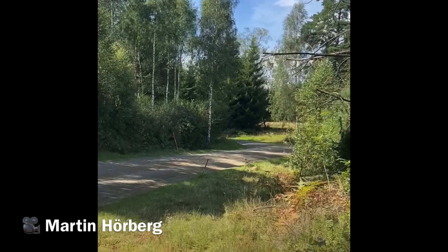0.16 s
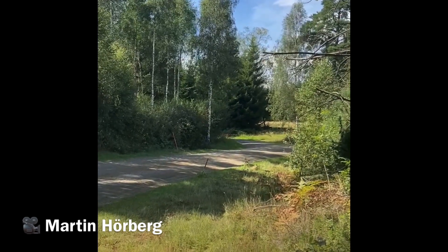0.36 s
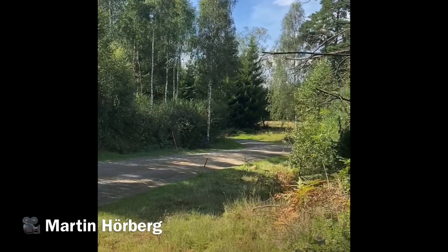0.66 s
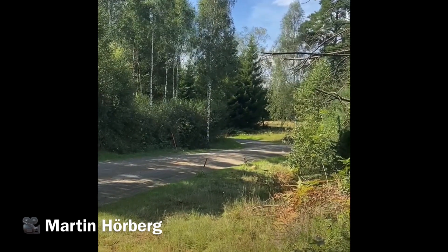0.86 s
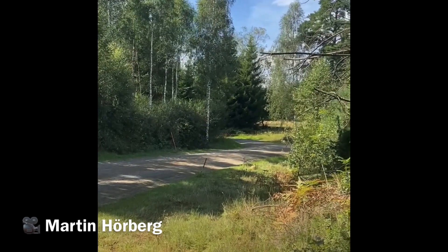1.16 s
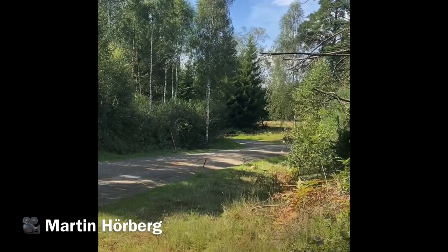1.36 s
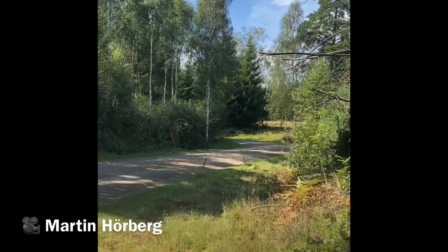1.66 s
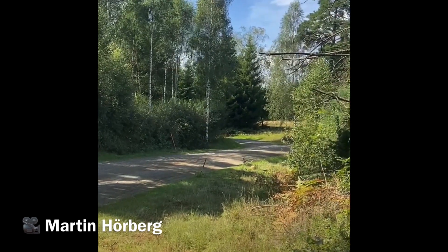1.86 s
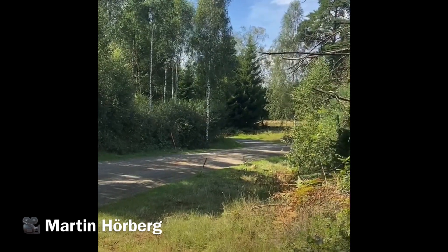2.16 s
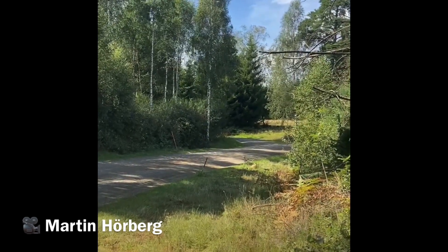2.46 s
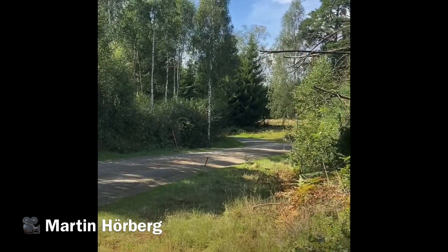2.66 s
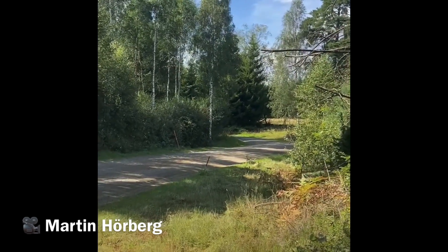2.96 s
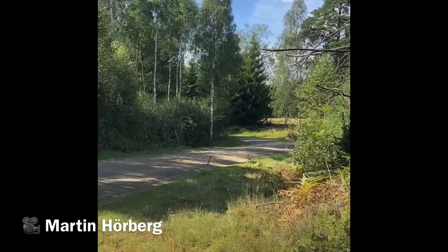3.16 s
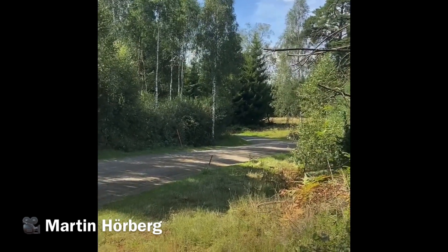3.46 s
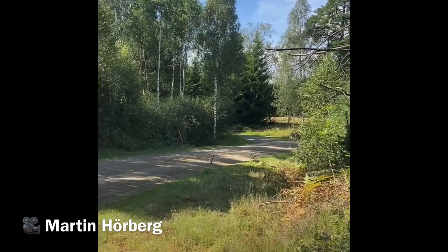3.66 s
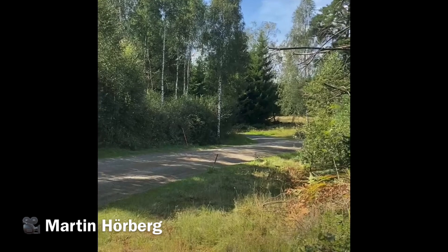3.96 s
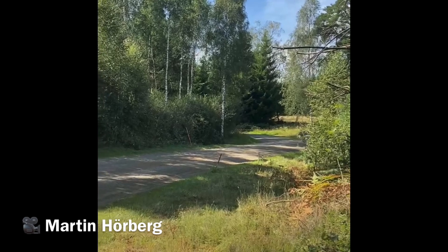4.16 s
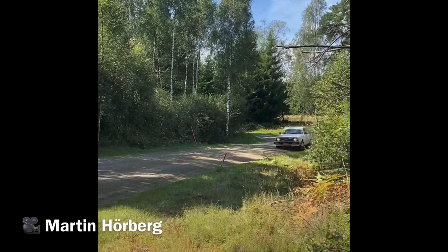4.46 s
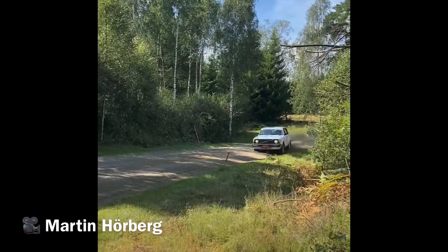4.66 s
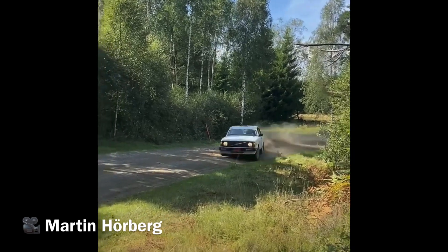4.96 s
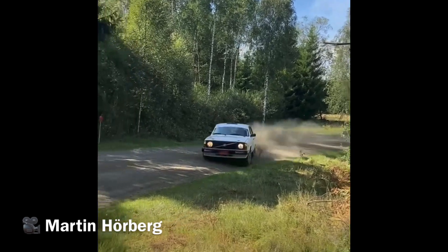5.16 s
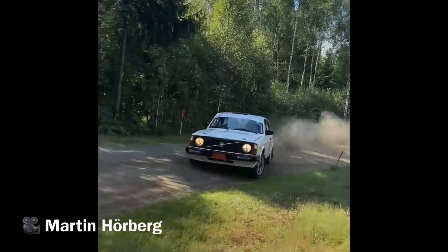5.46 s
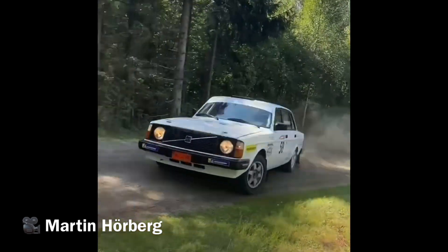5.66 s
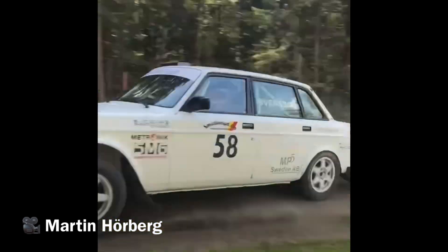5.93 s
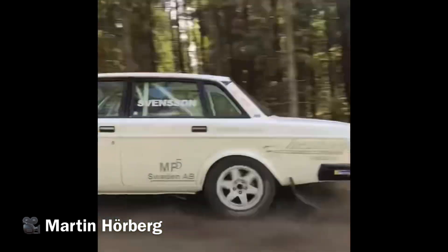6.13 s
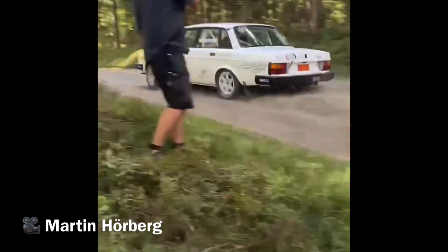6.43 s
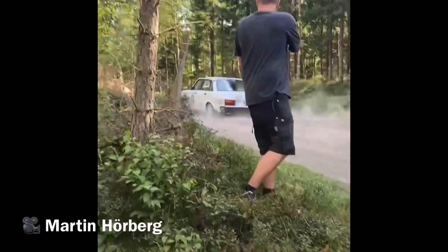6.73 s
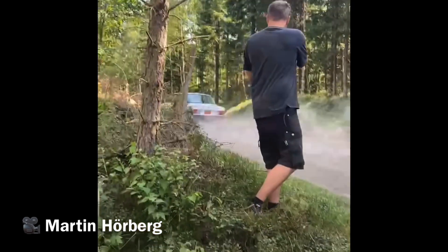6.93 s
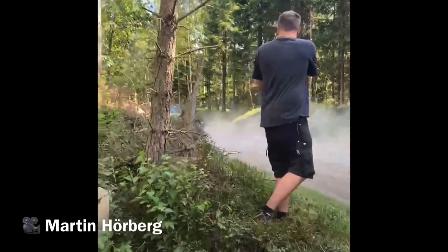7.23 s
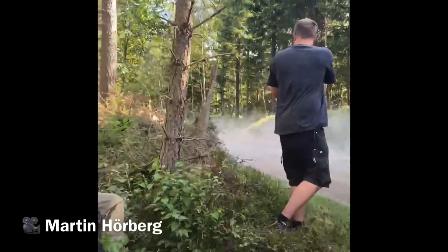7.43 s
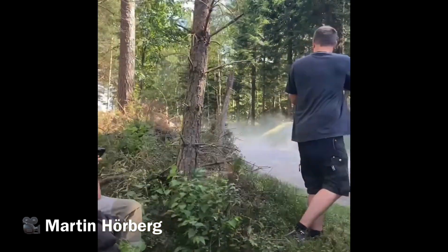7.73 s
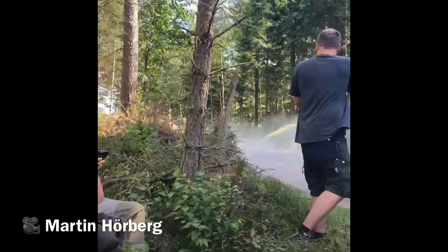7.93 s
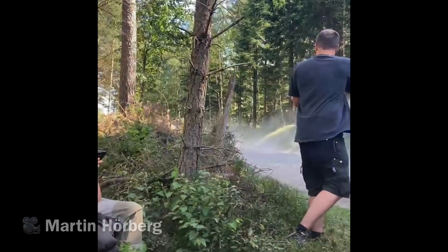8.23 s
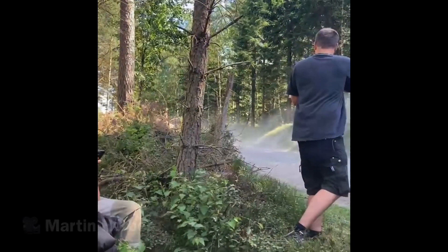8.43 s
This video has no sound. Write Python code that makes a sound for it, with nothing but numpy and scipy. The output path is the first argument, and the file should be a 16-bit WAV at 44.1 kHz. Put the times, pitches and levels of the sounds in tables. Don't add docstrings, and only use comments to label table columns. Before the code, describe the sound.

Distant engine revving swells through gusty wind into a loud close pass, crackling exhaust and hissing gravel, then recedes with a late gear change.

```python
import sys
import numpy as np
from scipy import signal
from scipy.fft import rfft, irfft, next_fast_len
from scipy.io import wavfile
from scipy.ndimage import uniform_filter1d, map_coordinates

SR = 44100
rng = np.random.default_rng(int(sys.argv[2]) if len(sys.argv) > 2 else 0)


def ratio_of_db(decibels):
    return 10 ** (np.asarray(decibels, float) / 20)


def to_wav(sig):
    pcm = np.clip(np.atleast_2d(sig), -1, 1) * 32767
    pcm = np.round(pcm).astype(np.int16)
    wavfile.write(sys.argv[1], SR, pcm.T)


N = 378814
MS = np.arange(0, N / SR + .002, .001)

# [time_s, firing_hz]
SPEED = [(0.0, 179.1), (0.5, 186.6), (1.48, 160.1), (1.58, 165.7), (1.86, 146), (2.52, 168.6),
         (3.68, 162.6), (3.99, 83.8), (4.25, 159.1), (4.6, 164.2), (5.05, 202.1), (5.26, 197.2),
         (5.61, 216.8), (5.92, 205.5), (6.8, 202.3), (7.09, 213.1), (7.51, 192.1), (8.59, 226.7)]
# [start_s, end_s, change_hz, lag_s]
SURGES = [
    (0.557, 0.86, -33, 0.039),
    (1.876, 2.067, 24, 0.073),
    (2.53, 2.964, 69, 0.14),
    (4.237, 4.435, 21, 0.068),
    (8.146, 8.993, -62.5, 0.081),
    (4.645, 4.757, 6.5, 0.029),
    (4.855, 5.055, -2, 0.046),
    (5.305, 5.444, 4, 0.068),
    (5.678, 5.803, 2.5, 0.033),
]


def engine_speed():
    pushes = sum(change * lagged(start, end, lag, lag) for start, end, change, lag in SURGES)
    return curves(SPEED)[0] + smooth(pushes)


# [start_s, end_s, extra_roar_db]
THROTTLE = [(0.484, 0.835, 8), (0.718, 0.857, 3), (0.887, 1.055, 5), (1.855, 2.036, 3), (2.523, 2.95, 10.5),
            (2.803, 2.974, -1.5), (3.59, 3.911, 5), (3.966, 4.028, 11.5), (4.125, 4.426, 9.5),
            (4.636, 4.896, 5), (4.7, 4.78, 2), (4.939, 5.251, 2), (5.276, 5.68, 0.5), (5.704, 5.861, 4)]


def throttle():
    open_lag_s, close_lag_s = 0.033, 0.036
    return smooth(sum(db * lagged(start, end, open_lag_s, close_lag_s) for start, end, db in THROTTLE))


# [multiple_of_cycle_rate, level_db]
INTAKE_ORDERS = [(6, -28), (7, -20), (9, -23), (10, -27), (11, -19), (12, -17), (13, -17), (14, -19),
                 (15, -27), (16, -25), (17, -19), (18, -27),
                 (19, -20)] + [(k, -24 + 4 * (k % 4 == 0) - .45 * (k - 20)) for k in range(20, 56)]
# [time_s, low_hz, middle_hz, high_hz, tilt_db_per_octave]
AIRBOX = [(0.67, 707, 857, 1000, -1.5), (1.93, 777, 994, 1200, -3.5), (2.62, 816, 920, 1400, -1),
          (2.78, 832, 926, 1350, -3.5), (2.92, 843, 965, 1300, -2), (3.75, 833, 990, 1300, 1.5),
          (4.2, 690, 970, 1200, 12), (4.36, 690, 900, 1330, 3.5), (4.68, 702, 970, 1450, 3.5),
          (4.78, 695, 934, 1520, 5), (4.9, 663, 1130, 1800, 4), (5.05, 637, 980, 1400, 0),
          (5.25, 677, 896, 1450, 2), (5.45, 642, 900, 1150, -2), (5.62, 663, 726, 910, 1),
          (5.75, 630, 820, 1250, -2), (5.87, 834, 1037, 1260, 2)]
# [freq_hz, level_db]
HISS = [(260, -48), (450, -32.5), (673, -6.5), (778, -7.5), (941, -2.5), (1470, -12), (3360, -36),
        (5500, -36), (6500, -49), (8450, -57.5), (14300, -120)]
# [time_s, level_db]
SHADE = [(6.1, -1.5), (7.0, -19.5), (8.3, -37.5)]


def intake(firing_hz, firings, near_db, open_db):
    coast_db, lines_db, air_db = -5, 3.5, -17
    roar_db = coast_db + LOW_SHARE * near_db + open_db + curves(SHADE)[0]
    *box_hz, tilt_db = curves(AIRBOX)
    start = rng.uniform(0, 2 * np.pi, len(INTAKE_ORDERS))
    lines = shapes(INTAKE_ORDERS, firing_hz / 4, start, box_hz, tilt_db,
                   peak_db=6, scatter_db=1.5, drift=.1, rate=8)
    past = np.clip((np.arange(N) / SR - 5.55) / 0.047, 0, 1)
    five_db = curves(EXHAUST)[0] - 7 - 8 * past
    beat_db = five_db + 1 + np.clip(1.5 * (roar_db + 23), -20, 0)
    beat = ratio_of_db(beat_db) * (np.cos(2.5 * np.pi * firings) + ratio_of_db(-8) * np.cos(1.5 * np.pi * firings + 2))
    veil_db = np.clip(roar_db + 24.5, -9, 0)
    valves = ratio_of_db(1.2 * np.cos(2 * np.pi * firings) + 1.5 * np.cos(np.pi / 2 * firings))
    air = coloured(valves * rng.standard_normal(N), HISS)
    return beat + ratio_of_db(roar_db + lines_db + veil_db) * lines + ratio_of_db(roar_db + air_db - veil_db) * air


SKEW = -.9
# [time_s, tone_db, octave_over_tone_db]
EXHAUST = [(0.0, -54, -2.5), (0.5, -44.5, -2), (1.3, -48.5, -4.5), (2.05, -38, -9.5), (2.52, -38.5, -6),
           (2.85, -23.5, -13.5), (3.2, -27, -22.5), (3.7, -25, -13.5), (3.92, -19, -62.5), (4.2, -16, -26),
           (4.65, -20.5, -26.5), (5.0, -10.5, -23), (5.7, -9.5, -21), (5.95, -9.5, -11.5),
           (6.8, -21, -11.5), (7.15, -28, -14.5), (8.08, -33, -27.5), (8.59, -38.5, -19.5)]
# [time_s, depth_db, half_length_s]
FADES = [(0.685, -9, 0.064), (1.412, -4, 0.078), (2.56, -6.5, 0.059), (2.965, -18, 0.017),
         (3.145, -7.5, 0.09), (4.06, -6, 0.061), (4.335, -5, 0.064), (4.449, -21, 0.018),
         (4.554, -4.5, 0.061), (4.667, -9, 0.011), (5.965, -15.5, 0.013), (6.091, -11.5, 0.018),
         (5.25, -1, 0.067), (5.798, -6.5, 0.035), (6.036, -2.5, 0.015), (6.168, 1, 0.034),
         (6.401, -0.5, 0.1), (8.197, -12, 0.073)]
# [time_s, octave_db, half_length_s]
STEEPER = [
    (3.07, 11.5, 0.11),
    (4.6, 13, 0.025),
    (4.765, 13.5, 0.069),
    (6.12, 4, 0.065),
    (6.403, -4.5, 0.28),
]
# [time_s, db_under_tone]
LUMP = [(5.9, -29), (6.15, -28), (7.2, -23.5), (7.6, -34.5), (8.59, -23)]
# [time_s, level_db]
SHIFT = [
    (8.09, 3),
    (8.15, 1),
    (8.26, -6.5),
    (8.3, 10),
]


def firing_tone(firings, near_db, behind):
    tone_db, steep_db = curves(EXHAUST)
    faded_db = tone_db + bumps(FADES)
    far = np.clip((-45 - near_db) / 10, 0, 1) * (1 - behind)
    flutter_db = -3.5 * far * wobble(26.28)
    octave_db = tone_db + steep_db + bumps(STEEPER) + curves(SHIFT)[0] + flutter_db
    main = ratio_of_db(faded_db + np.tanh(wobble(24))) * np.cos(2 * np.pi * firings)
    octave = ratio_of_db(octave_db + 1.2 * wobble(30)) * np.cos(4 * np.pi * firings + SKEW)
    shaft = wobble(25) * np.cos(np.pi * firings) + 1.1 * wobble(25) * np.cos(1.5 * np.pi * firings)
    lump = wobble(30) * np.cos(3 * np.pi * firings) + 0.27 * wobble(30) * np.cos(1.5 * np.pi * firings)
    rough = ratio_of_db(faded_db - 24.0) * shaft + ratio_of_db(faded_db + curves(LUMP)[0]) * lump
    return np.sqrt(2) * (main + octave + rough)


# [time_s, bark_db, crack_db]
TAILPIPE = [(5.3, -88.5, -54.5), (5.6, -38.5, -42), (5.82, -24.5, -36), (5.95, -24.5, -34.5),
            (6.1, -20, -25), (6.18, -18.5, -23.5), (6.25, -24, -22), (6.33, -25, -24), (6.42, -23, -23),
            (6.5, -24, -34), (6.57, -27, -44), (6.72, -29.5, -44.5), (6.9, -46.5, -48), (7.05, -41.5, -55),
            (7.2, -46, -58), (7.4, -43, -58), (7.7, -55.5, -63.5), (8.59, -74, -73)]
# [multiple_of_firing_rate, level_db]
BARK = [(k, -13 - 6 * np.log2(k / 3) - 2 * max(k - 13, 0)) for k in range(1, 25)]
# [time_s, peak_hz]
PULSE_PEAK = [(5.8, 1310), (5.95, 2050), (6.05, 1870), (6.13, 1850), (6.19, 1670), (6.38, 1630), (6.45, 1100),
              (6.52, 1625), (6.62, 1460), (6.75, 1590), (6.9, 1790), (7.1, 1270), (7.3, 1740), (7.5, 1250)]
# [freq_hz, level_db]
CRACK = [(710, -51.5), (1200, -6.5), (1700, -3), (2530, -7), (3600, -9.5), (5650, -11.5), (6610, -25),
         (11300, -24.5), (12500, -50.5), (16200, -81.5), (22000, -120)]
# [time_s, level_db]
THIRD = [(5.6, -85), (5.75, -45), (5.95, -37), (6.1, -28), (6.3, -31), (6.5, -41.5), (6.75, -41),
         (6.95, -43), (7.12, -57), (7.25, -45), (7.45, -47.5), (7.7, -56.5), (8.1, -64), (8.59, -78)]
# [time_s, delay_ms, share]
ROAD = [(5.8, .3, 0.33), (5.98, 0.33, 0.5), (6.08, 0.4, 0.53), (6.14, 0.35, 0.96), (6.2, 0.39, 0.79),
        (6.32, .35, .85), (6.4, 0.23, 0.18), (6.5, .33, 0.38), (6.6, 0.14, 0.5), (6.8, 0.43, 0.27)]
# [time_s, delay_ms, share]
GROUND = [(5.8, 1.1, .2), (6.2, 0.74, 0.11), (6.4, 1.4, .3), (6.52, 2.45, 0.34), (6.7, 2.45, 0.34),
          (6.9, 1.5, .5), (7.1, 1.55, 0.88), (7.6, 1.56, .6)]


def tailpipe(firing_hz, firings):
    bark_db, crack_db = curves(TAILPIPE)
    dull_db = -3 + 0.14 * bark_db
    upper = BARK[3:]
    notch = np.maximum(SKEW * (np.arange(len(upper)) + 3), -np.pi)
    pulse = shapes(upper, firing_hz, notch, curves(PULSE_PEAK), dull_db,
                   peak_db=10, scatter_db=2, drift=.3, rate=14)
    crest = np.cos(2 * np.pi * firings) - 1
    burst = (.2 + np.exp(3 * crest)) * ratio_of_db(1.5 * wobble(150))
    edge = np.exp(150 * crest) * ratio_of_db(2 * wobble(60))
    front = ratio_of_db(1) * unit(edge) / np.sqrt(5)
    crack = ratio_of_db(crack_db - 9.5) * coloured(unit(burst * rng.standard_normal(N)) - front, CRACK)
    shot = ratio_of_db(bark_db - 1.5) * pulse + crack
    high = filtered(shot, lambda hz: hz ** 4 / (hz ** 4 + 800 ** 4))
    third_db = curves(THIRD)[0] + wobble(20)
    third = np.sqrt(2) * ratio_of_db(third_db) * np.cos(6 * np.pi * firings + 2 * SKEW)
    return ratio_of_db(curves(SHIFT)[0]) * (shot + third + echo(high, ROAD) + echo(high, GROUND))


def echo(x, rows):
    late_ms, share = curves(rows)
    late = map_coordinates(x, [np.arange(N) - late_ms * SR / 1000], order=1)
    return np.clip(share, 0, 1) * late


LOW_SHARE = 0.66
# [freq_hz, level_db]
ROAR = [(59, -46), (100, -5), (167, 3), (242, -3), (326, 1), (560, -2.5), (1210, -5.5), (2460, -14),
        (3000, -23), (3900, -82.5), (6600, -120)]
# [freq_hz, level_db]
SPRAY = [(880, -12.5), (1500, -5), (5530, -16.5), (6430, -24), (6780, -41), (6960, -90), (7740, -53.5),
         (8240, -17), (9410, -21), (11500, -26.5), (12500, -73.5), (16200, -105), (22000, -120)]
# [time_s, spray_db, extra_top_db, half_length_s]
SHOWERS = [(0.75, -3, 5, .12), (1.9, 7.5, -3, 0.045), (2.62, -4.5, -6, .08), (2.85, 4.5, -5.5, 0.14),
           (3.3, -3.5, -1, 0.49), (4.4, 2.9, 0.5, 0.17), (4.6, -1.2, 3, 0.064), (5.05, -1.5, 1, 0.31),
           (5.7, 0.2, 1, 0.078), (6.2, 1.5, -0.5, 0.086), (6.5, 3, -1.5, 0.056), (6.59, -3, 0, 0.023),
           (6.66, 2, -1, 0.024), (6.78, 0, 4, 0.024), (6.87, 5, 2, 0.043), (7.9, 3.2, 7, 0.55)]


def gravel(near_db, open_db, behind):
    spin_db = 0.61 * open_db
    spray_db = near_db + spin_db
    roar_db = -9 + LOW_SHARE * spray_db - 9 * behind
    shower_db = spray_db + bumps(SHOWERS)
    roar = coloured(ratio_of_db(1.8 * wobble(12)) * rng.standard_normal(N), ROAR)
    grains = coloured(rng.standard_normal(N) * ratio_of_db(1.5 * wobble(600) + 1.3 * wobble(9)), SPRAY)
    fizz = filtered(grains, lambda hz: hz > 7400)
    fizz_db = 0.32 * (shower_db + 14.5) - 0.46 * spin_db + bumps(SHOWERS, column=2)
    return ratio_of_db(roar_db + 2.0) * roar + ratio_of_db(shower_db - 1.0) * (grains - fizz + ratio_of_db(fizz_db) * fizz)


# [freq_hz, t60_s]
WOOD = [(150, 0.62), (1000, 0.32), (4000, 0.02), (10000, 0.36)]


def forest(x):
    hz, t, z = signal.stft(rng.standard_normal((2, SR // 2)), SR, nperseg=256)
    tail = signal.istft(z * ratio_of_db(-60 * t / along(WOOD, hz)[:, None]), SR, nperseg=256)[1]
    tail = tail / np.linalg.norm(tail[0])
    late = np.pad(x, (1300, 0))[:N]
    feed = filtered(late, lambda hz: hz ** 2 / (hz ** 2 + 350 ** 2))
    alike, apart = signal.fftconvolve(feed[None], tail, axes=1)[:, :N]
    apart = filtered(apart, lambda hz: hz ** 2 / (hz ** 2 + 2000 ** 2))
    return ratio_of_db(-5.5) * alike, ratio_of_db(-4) * apart * np.array([[1], [-1]])


# [time_s, thump_db, half_length_s]
GUSTS = [(0.05, -42, 0.26), (0.628, -36.5, 0.036), (0.8, -48, .08), (0.43, -44, 0.052),
         (0.997, -34.5, 0.16), (1.196, -36, 0.19), (2.52, -35, 0.068), (5.724, -53, 0.043),
         (8.169, -49, 0.023), (1.745, -35, 0.03), (1.965, -38, 0.15), (2.312, -40.5, .15),
         (2.754, -28.5, 0.13), (3.004, -32, 0.045), (3.203, -31, 0.047), (3.484, -32.5, 0.34),
         (3.989, -31, 0.1), (4.5, -30.5, 0.81), (4.986, -33.5, 0.056), (5.348, -46, 0.15),
         (5.824, -39.5, 0.12), (6.159, -41, 0.048), (6.796, -58, 0.28), (7.604, -56.5, 0.98)]
# [freq_hz, level_db]
THUMP = [(12, -57), (20, -18), (47, 2), (70, 9), (130, -4), (140, -18), (180, -24.5), (310, -120)]


def wind():
    lull_db = -62
    power = ratio_of_db(2 * lull_db) + sum(ratio_of_db(2 * db) * bell(s, half) for s, db, half in GUSTS)
    thump_db = smooth(10 * np.log10(power))
    lumps = ratio_of_db(3 * wobble(12))
    both, apart = (coloured(lumps * rng.standard_normal(N), THUMP) for _ in range(2))
    return ratio_of_db(thump_db + .1) * (both + ratio_of_db(-18.5) * apart * np.array([[1], [-1]]))


# [time_s, peak_db, pitch_hz]
SLAPS = [
    (2.696, -9.5, 121.9),
    (2.68, -7, 196),
    (2.736, -15, 104.4),
    (2.894, -3, 92.9),
    (3.001, -10, 72.6),
    (3.176, -4, 79.2),
    (3.238, -9, 75.4),
    (3.346, -32, 64.3),
]


def slaps():
    t = np.arange(N) / SR
    out = np.zeros(N)
    for start, db, hz in SLAPS:
        swell = np.exp(-((t - start - .025) / 0.0083) ** 2)
        out += ratio_of_db(db - 9.5) * swell * np.sin(2 * np.pi * hz * (t - start))
    return out


# [freq_hz, left_over_right_db]
LEAN = [
    [(200, -1), (350, -2.5), (600, 8.5), (1150, 5.5), (1700, -0.5), (2400, 1), (3400, -1.5), (4400, -4), (5600, 2.5)],
    [(200, 0.0), (350, 2), (630, 6.5), (1050, 8.5), (1600, 3), (2400, 3.5), (3500, -5), (4500, -0.5), (5600, 3)],
]
# [freq_hz, left_leads_rad]
LEAD = [
    [(0, 0), (2330, -0.0), (2670, 1.2), (3010, -1.4), (3530, -0.1), (4220, 0.6), (5250, -0.1), (5600, 0.3), (6460, 3.1), (8270, 3.2), (8790, 4.0), (9040, 5.8), (9300, 6.3), (12300, 6.3)],
    [(0, 0), (860, 0.1), (1210, -0.3), (2330, 0.2), (3100, -2.4), (3530, -4.6), (3880, -5.7), (4820, -6.3), (5600, -6.1), (6370, -3.2), (8610, -3.1), (9130, -0.0), (11600, 0.0), (12300, -0.2)],
]


def ports(x, side):
    def pair(hz):
        half = np.array([[.5], [-.5]])
        both = ratio_of_db(half * along(LEAN[side], hz)) * np.exp(1j * half * along(LEAD[side], hz))
        mean = both.mean(0)
        return both * np.conj(mean) / np.abs(mean) / np.maximum(np.abs(mean), .38)
    return filtered(x, pair)


def unit(x):
    return x / np.sqrt(np.mean(x ** 2) + 1e-20)


def along(points, hz):
    f, v = np.transpose(points)
    return np.interp(np.log(hz + 1), np.log(f + 1), v)


def curves(rows):
    s, *cols = np.transpose(rows)
    return [np.interp(np.arange(N) / SR, s, c) for c in cols]


def wobble(rate):
    return map_coordinates(rng.standard_normal(int(N * rate / SR) + 4), [np.arange(N) * rate / SR])


def filtered(x, response):
    m = next_fast_len(N + 8192)
    return irfft(rfft(x, m) * response(np.fft.rfftfreq(m, 1 / SR)), m)[..., :N]


def coloured(x, spectrum):
    return unit(filtered(x, lambda hz: ratio_of_db(along(spectrum, hz))))


def shapes(orders, rate_hz, start, peaks_hz, tilt_db, peak_db, scatter_db, drift, rate):
    k, db = np.transpose(orders)
    at = np.minimum(np.arange(int(N * rate / SR) + 4) * SR // rate, N - 1).astype(int)
    octaves = np.log2(np.outer(rate_hz[at], k) / np.array(peaks_hz)[:, at, None])
    chance = rng.standard_normal((2, len(at), len(k)))
    colour_db = peak_db * np.exp(-(octaves / 0.2) ** 2).max(0) + tilt_db[at, None] * octaves.mean(0)
    size = ratio_of_db(db + colour_db + scatter_db * chance[0])
    lines = np.zeros((len(at), 257), complex)
    lines[:, np.round(k).astype(int)] = size * np.exp(1j * (start + drift * chance[1]))
    waves = irfft(lines, axis=1)
    turns = np.cumsum(rate_hz) / SR
    place = [np.arange(N) * rate / SR, turns % 1 * 512]
    return unit(map_coordinates(waves, place, order=1, mode="grid-wrap"))


def lagged(start, end, rise, fall):
    risen = 1 - np.exp(-np.clip(MS - start, 0, end - start) / rise)
    return risen * np.exp(-np.maximum(MS - end, 0) / fall)


def bell(s, half):
    return np.exp(-((MS - s) / half) ** 2)


def bumps(rows, column=1):
    return smooth(sum(row[column] * bell(row[0], row[-1]) for row in rows))


def smooth(control):
    return np.interp(np.arange(N) / SR, MS, control)


def skipped(x, dropped, size):
    hz, t, z = signal.stft(x, SR, nperseg=1024)
    chance = uniform_filter1d(rng.standard_normal((len(hz) // size + 1, len(t))), 4, axis=1)
    rank = chance.argsort(1).argsort(1) / len(t)
    rank = np.repeat(rank, size, axis=0)[:len(hz)]
    return signal.istft(z * (rank >= along(dropped, hz)[:, None]), SR, nperseg=1024)[1][:N]


# [time_s, coasting_spray_db]
NEAR = [(0.0, -56), (1.5, -57.5), (1.85, -56.5), (2.4, -53), (2.7, -47.5), (2.8, -45), (3.0, -40),
        (4.1, -44.5), (4.5, -36), (4.9, -29), (6.15, -29.5), (6.3, -33), (6.75, -42), (7.05, -51),
        (7.55, -53.5), (8.59, -68.5)]
# [time_s, share_behind]
TURN = [
    (5.8, 0),
    (6.2, 1),
]


def scene():
    firing_hz = engine_speed()
    firings = np.cumsum(firing_hz) / SR
    open_db = throttle()
    near_db, = curves(NEAR)
    behind, = curves(TURN)
    tyres = gravel(near_db, open_db, behind)
    front = intake(firing_hz, firings, near_db, open_db) + (1 - behind) * tyres
    rear = firing_tone(firings, near_db, behind) + tailpipe(firing_hz, firings) + behind * tyres
    alike, apart = forest(front + ratio_of_db(-8 * behind) * rear)
    direct = ports(front + (1 - behind) * alike, 0) + ports(rear + behind * alike, 1)
    return direct + apart + wind() + slaps()


def top_cut(x):
    return signal.sosfilt(signal.butter(12, 12720, fs=SR, output="sos"), x)


# [freq_hz, share_of_frames]
DROPPED = [(6000, 0), (6300, .3), (6600, .97), (6800, 1), (7700, 1), (8100, .9), (8300, .5), (8700, .4),
           (9000, .18), (11000, .16), (11500, .35), (11800, 1)]
# [freq_hz, share_of_frames]
SIDE_DROPPED = [(200, .65), (340, .5), (420, .05), (600, 0), (1500, .03), (2300, .2), (2800, 0), (4000, .2),
                (4700, .3), (5100, .8), (5600, .8), (5900, 0)]
# [freq_hz, level_db]
SUM_GAP = [(6300, 1), (6750, -24), (7850, -40.5), (8350, 1)]
# [freq_hz, level_db]
SIDE_GAP = [(150, 6), (350, 2.5), (500, -1.8), (2400, 4.8), (3300, 0.5), (4500, 6.5), (5300, 0.5),
            (5900, -2.5), (7000, 5.5), (8000, 1.5), (8800, -3), (9450, -8), (9600, -32)]
# [time_s, share]
KEPT = [(6.185, 0), (6.195, .25), (6.205, 0), (6.26, 0), (6.27, .6), (6.285, 0), (6.335, 0), (6.35, 1),
        (6.39, 1), (6.405, 0)]


def record(dry):
    left, right = dry / (1 + np.abs(dry / .9) ** 6) ** (1 / 6)
    both = skipped(left + right, DROPPED, size=5)
    apart = skipped(left - right, SIDE_DROPPED, size=7)
    gaps = lambda hz: ratio_of_db([along(SUM_GAP, hz), along(SIDE_GAP, hz)])
    mid, side = filtered(np.array([both, apart]) / 2, gaps)
    lost = filtered((left + right) / 2 - mid, lambda hz: (hz > 6350) & (hz < 8600))
    mid = mid + 3 * curves(KEPT)[0] * lost
    return top_cut(np.array([mid + side, mid - side]))


dry = scene()
out = record(dry)
to_wav(out)
```